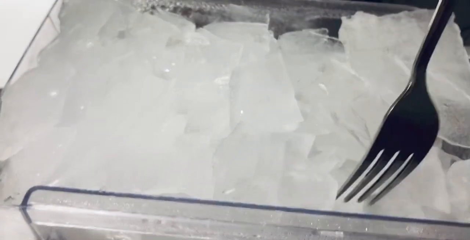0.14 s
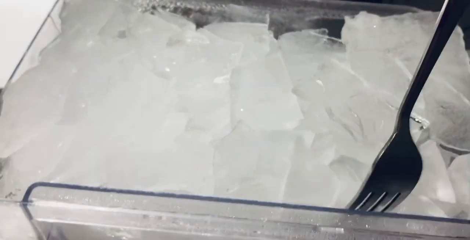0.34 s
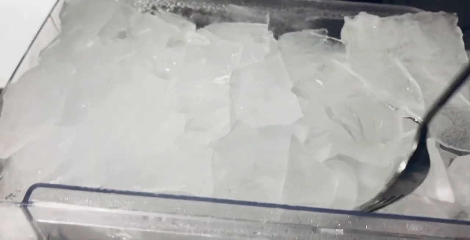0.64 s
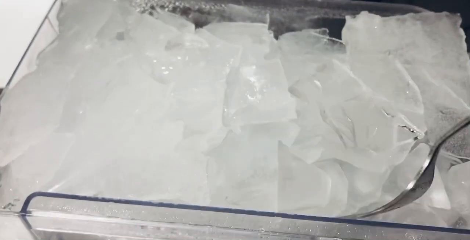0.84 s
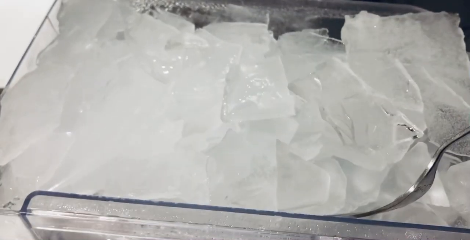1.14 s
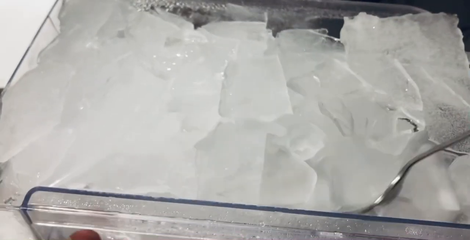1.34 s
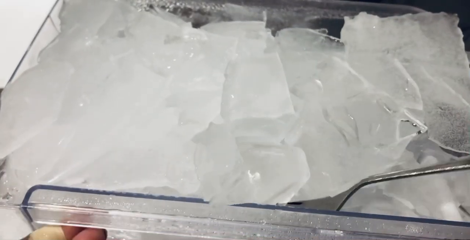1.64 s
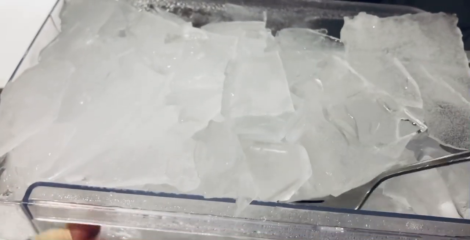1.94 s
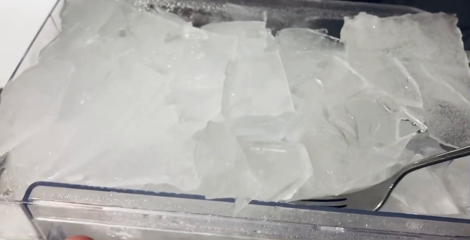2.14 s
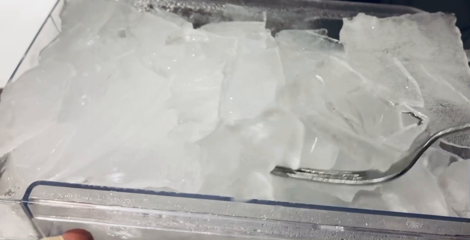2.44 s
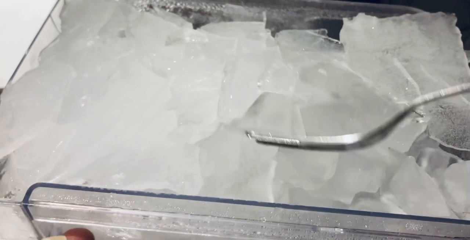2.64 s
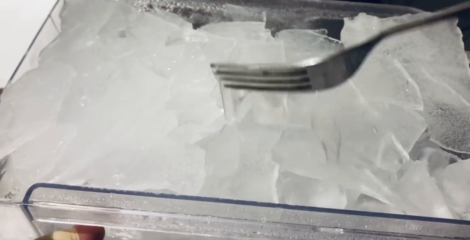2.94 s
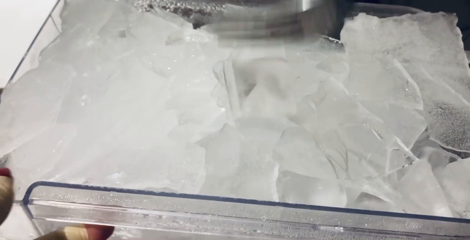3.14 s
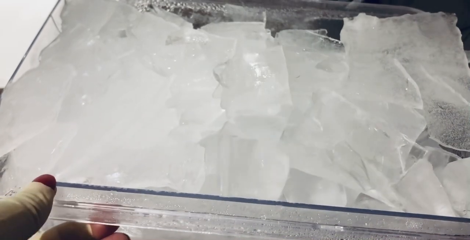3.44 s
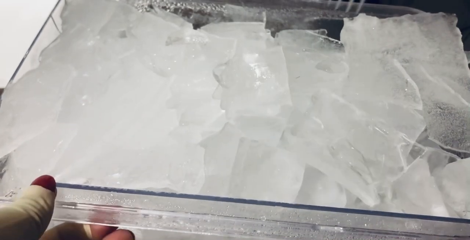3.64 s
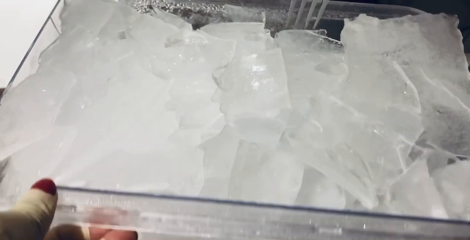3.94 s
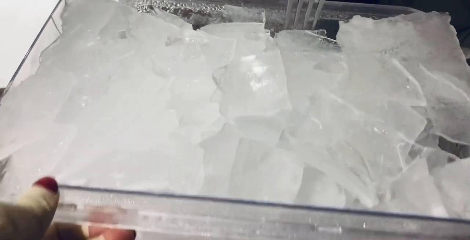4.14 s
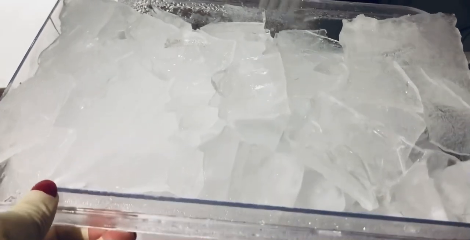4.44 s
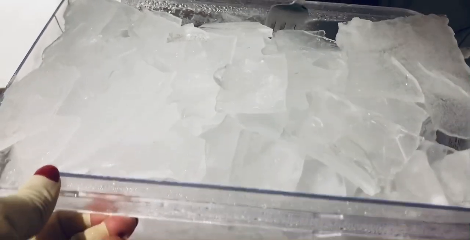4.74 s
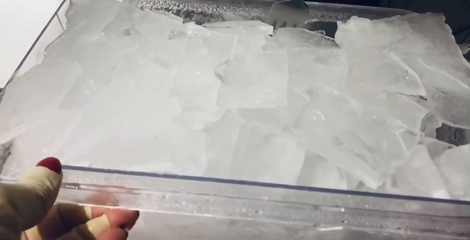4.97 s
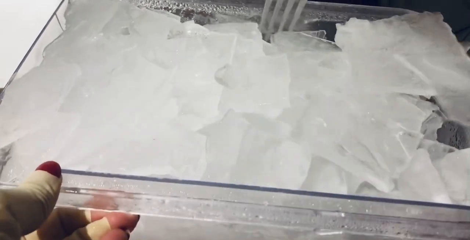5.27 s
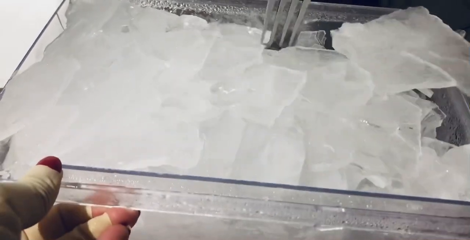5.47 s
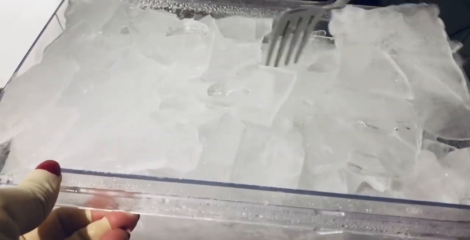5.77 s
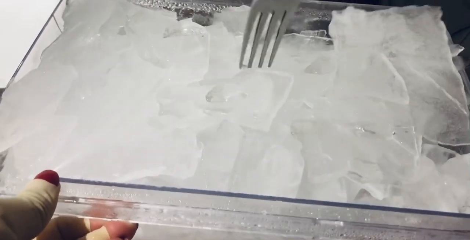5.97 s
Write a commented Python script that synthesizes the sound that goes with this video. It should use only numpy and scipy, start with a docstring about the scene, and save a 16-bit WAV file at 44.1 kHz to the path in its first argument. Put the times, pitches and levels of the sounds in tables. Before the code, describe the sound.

Heard close up at a freezer, over its faint hum, a few dull knocks on a plastic drawer lead into a sharp crunch of a metal fork breaking frost. The wedged tines tick and chatter lightly, then spring free with a thin ring. Loose ice clacks down in the hollow drawer, and after a brief pause the fork digs in again with repeated gritty scrapes and brittle snaps.

```python
"""A crisp crunch and dull knocks, close to one microphone at a plastic freezer drawer.
A steel fork bumps the drawer, then scrapes and levers slabs of frost: its tines crush tiny grains, ring
as they catch and chatter while wedged. Edges snap off, loose slabs drop back with a clack, and every
fracture shakes the hollow drawer, which groans briefly on its runners. The freezer hums faintly behind."""
import sys
import numpy as np
from scipy import signal
from scipy.fft import rfft, irfft
from scipy.io import wavfile
from scipy.ndimage import uniform_filter1d, minimum_filter1d, map_coordinates

SR = 44100
rng = np.random.default_rng(int(sys.argv[2]) if len(sys.argv) > 2 else 0)


def wrap_up_sound(samples):
    """Save the sound to the file named by the first command line argument, as 16-bit audio."""
    columns = np.atleast_2d(samples).T
    # keep every value between -1 and 1, then stretch to whole-number steps
    tamed = np.clip(columns, -1, 1)
    steps = np.round(tamed * 32767).astype(np.int16)
    wavfile.write(sys.argv[1], SR, steps)


N = 269451
TIME = np.arange(N) / SR

# spectra of the freezer's hum, the frost grit, a scraped slab and the hollow drawer: f/Hz, level/dB
HUM_SPECTRUM = [(20, -30), (45, -17), (80, -7), (125, -5), (200, -14.5), (260, -11), (500, -49),
                (1200, -41), (4000, -38), (16000, -40.5)]
GRIT_SPECTRUM = [(2000, -14.5), (3200, -8.5), (4100, 1), (5000, -3.5), (6500, 1.5), (7800, 0.5),
                 (10500, 0.5), (13500, -0.5), (15300, 4), (17500, -32)]
SLAB_SPECTRUM = [(600, -18), (1000, 0), (1220, -0.5), (1450, 5.5), (1900, -1), (2700, -1), (3800, -3)]
DRAWER_SPECTRUM = [(45, -26), (120, -18), (220, -10.5), (330, -5), (440, 1), (560, 3), (700, -1.5),
                   (880, -6), (1400, -18.5)]
# pushes of the fork into the frost: t/s, rise/s, hold/s, level/dB, extra drive to slabs and drawer/dB
PUSHES = [(0.023, 0.0034, 0.013, -27, 1.5), (0.059, 0.0035, 0.006, -32.5, 7.5),
          (0.174, 0.026, 0.12, -36.5, 4.5), (0.261, 0.0058, 0.0067, -29, -4),
          (0.689, 0.0044, 0.0057, -28, -9), (1.135, 0.07, 0.016, -18, -4.5),
          (1.218, 0.0092, 0.0076, -14, -3), (1.243, 0.014, 0.003, -13.5, -7),
          (1.262, 0.017, 0.069, -18.5, -0.5), (1.351, 0.005, 0.048, -26, -6), (1.413, 0.06, 0.16, -32, -1),
          (1.556, 0.0063, 0.0069, -28.5, 4), (1.652, 0.013, 0.007, -36.5, 4.5),
          (1.996, 0.0061, 0.007, -36.5, -4.5), (2.233, 0.0075, 0.0064, -32.5, -3),
          (2.261, 0.042, 0.013, -17, -1.5), (2.313, 0.0113, 0.084, -30.5, -3.5),
          (2.482, 0.045, 0.054, -36.5, 1), (2.59, 0.081, 0.14, -35.5, 2),
          (2.731, 0.077, 0.0075, -25.5, -4.5), (3.168, 0.0077, 0.0072, -39.5, 6),
          (3.261, 0.0078, 0.027, -40, 2), (4.387, 0.0067, 0.008, -21.5, -6.5),
          (4.394, 0.05, 0.071, -20, -1), (4.537, .005, 0.0049, -28.5, -2),
          (4.604, 0.027, 0.066, -40.5, -0.5), (4.729, 0.003, 0.0033, -32.5, 2),
          (4.758, 0.0036, 0.075, -29.5, 0.5), (4.936, 0.013, 0.042, -31, -2.5),
          (5.005, 0.049, 0.018, -19.5, -2), (5.137, 0.0092, 0.0076, -27, -2.5),
          (5.173, 0.089, 0.042, -22.5, -5), (5.302, 0.034, 0.066, -27.5, -5),
          (5.411, 0.039, 0.062, -34.5, -2.5), (5.527, 0.0073, 0.057, -34.5, 2),
          (5.662, 0.026, 0.0066, -25, 4), (5.732, 0.0125, 0.036, -28, 2.5),
          (5.799, 0.0065, 0.0076, -19, -1), (5.869, 0.0063, 0.064, -42.5, 2),
          (6.007, 0.0032, 0.0049, -28.5, 4), (6.067, 0.0099, 0.011, -29.5, -1)]
# light slides between the pushes, one curve each: t/s, level/dB
SLIDES = [
    [(0.36, -84), (0.42, -52), (0.58, -36.5), (0.78, -41), (0.9, -49), (1.0, -63), (1.06, -56), (1.12, -59)],
    [(1.72, -45), (1.77, -37), (1.85, -58.5), (1.97, -47.5), (2.12, -51.5), (2.2, -66.5)],
    [(2.87, -54), (2.94, -45), (2.99, -70), (3.1, -53), (3.2, -49.5), (3.46, -47), (3.57, -48.5),
     (3.72, -65.5), (3.82, -77)],
    [(3.88, -42.5), (3.97, -58), (4.17, -63), (4.36, -82.5)],
]
# one value a slide: extra drive to slabs and drawer/dB
SLIDE_HOLLOW_DB = [-5, -1, 5, 3.5]
# soft frost rasps finely, hard ice breaks coarsely: t/s, coarseness (1 = usual)
COARSENESS = [(.3, .6), (.45, .95), (1.0, .9), (1.15, .45), (1.5, .55), (1.75, 1.1), (2.2, 1.1), (2.28, .6),
              (2.45, 1.05), (4.85, 1.05), (5.03, .65), (5.8, .9)]
# modes of the dragging tines: f/Hz, level/dB, t60/s
TINE_MODES = [(4045, -25, 0.04), (5500, -27, 0.04), (6400, -19.5, 0.035), (8550, -24, 0.04),
              (9980, -19, 0.03), (13100, -18, 0.03)]
# the slab under the fork: from t/s, pitch as a multiple of the usual slab's
SLABS_TOUCHED = [(0, 1.33), (1.1, 1.0)]
# dull knocks, the fork bumping the drawer at first, then slabs landing with a clack:
# t/s, thump level/dB, thump f/Hz, clack level/dB
KNOCKS = [(0.03, -27.5, 420, -50), (0.062, -26, 540, -45), (0.2, -28.5, 700, -50),
          (0.279, -26.5, 500, -28.5), (0.695, -32, 493, -57), (0.758, -34, 487, -37), (1.56, -35, 570, -25),
          (2.729, -20.5, 510, -23.5), (3.122, -31, 510, -27.5), (3.312, -24.5, 544, -20.5),
          (3.437, -30, 527, -27), (3.609, -18.5, 404, -17.5), (3.842, -28.5, 460, -29.5),
          (3.852, -23.5, 440, -18.5), (3.862, -22.5, 334, -39), (4.04, -35.5, 495, -46.5),
          (4.074, -38, 498, -48.5), (4.462, -21, 440, -25), (4.501, -20.5, 340, -17),
          (4.655, -26, 467, -30), (4.696, -33, 410, -30.5), (4.783, -29, 384, -37),
          (4.968, -22, 414, -22.5)]
# spectrum of a knock's clack: f/Hz, level/dB
CLACK_SPECTRUM = [(720, -31.5), (960, 0), (1180, -4.5), (1490, 6), (1950, -6), (2430, 3.5), (2630, -4),
                  (2900, 3), (3500, -5.5), (16000, -14)]
# spectrum of a knock's thump: multiple of its pitch, level/dB
THUMP_SPECTRUM = [(.45, -21), (.8, -3.5), (1, 0), (1.35, -4), (1.8, -18)]
# brittle snaps, dry at low Q, glassy at high: t/s, level/dB, shard f/Hz, Q, drawer level/dB, rise/s
SNAPS = [(0.2311, -24.5, 4370, 3.7, -35, 0.0014), (0.592, -34, 9500, 1.4, -65, .0004),
         (0.6238, -28, 11200, 30, -37.5, 0.0021), (0.66, -39, 12500, 1.9, -64, 0.0016),
         (0.853, -32, 8200, 1.8, -78, 0.0011), (0.892, -41, 3450, 0.7, -48, 0.00097),
         (1.021, -39.5, 4400, 2.9, -53.5, 0.0012), (1.3069, -0.5, 10000, 30, -36, 0.0004),
         (1.336, -19.5, 9400, 22, -40, 0.00064), (1.564, -22, 4000, 1.1, -53, 0.00084),
         (1.7695, -32, 11600, 10, -63, 0.0007), (2.2122, -18, 15000, 5.4, -75, 0.00069),
         (2.386, -25, 2000, 0.57, -32, 0.00072), (2.4585, -23, 15000, 2, -45, 0.00036),
         (2.502, -22.5, 13200, 10, -52, 0.00063), (2.516, -26.5, 5770, 0.31, -44, 0.0016),
         (2.645, -20.5, 8860, 33, -46, 0.00071), (2.7891, -13, 4330, 1.6, -65, 0.00034),
         (2.8098, -24, 5870, 1.8, -32.5, 0.0005), (2.818, -26, 5300, 0.96, -32.5, 0.00064),
         (2.956, -26.5, 3600, 1.1, -38.5, 0.0013), (3.0204, -34.5, 4220, 6.9, -45, 0.00051),
         (3.09, -29, 14800, 2.5, -44, 0.00092), (3.1635, -26, 4500, 5.2, -35.5, 0.00041),
         (3.186, -26, 1500, 0.86, -41, 0.0018), (3.22, -26.5, 6100, 3.5, -65, 0.00061),
         (3.2386, -20, 5600, 4.7, -36, 0.00023), (3.2493, -9, 14100, 1.6, -30, 0.00063),
         (3.2862, -28, 13000, 2.5, -53, 0.00049), (3.3666, -25, 6000, 2.9, -46, 0.00063),
         (3.5135, -31, 2720, 2.9, -57, 0.0004), (3.632, -21, 14200, 7.9, -49.5, 0.0017),
         (3.763, -37.5, 1860, 1.1, -42.5, 0.00086), (4.2537, -49, 2550, 12, -59, 0.00064),
         (4.422, -15.5, 11900, 1.5, -46, 0.0016), (4.4444, -8, 5650, 1.1, -22.5, 0.0015),
         (4.5167, -14, 5000, 1.3, -46, 0.0013), (4.656, -27, 4540, 1, -63, 0.0006),
         (4.6967, -28, 5400, 0.8, -42, 0.0009), (4.8125, -21, 8500, 0.8, -45, 0.0014),
         (4.889, -36, 5300, 1, -63, 0.0009), (5.0819, -20.5, 7300, 1.7, -49, 0.0014),
         (5.2688, -16, 8300, 1.6, -51, 0.0012), (5.3996, -22, 1830, 2.3, -44, 0.0025),
         (5.6524, -11.5, 9000, 0.55, -28, 0.0011), (5.721, -21, 7200, .4, -32, 0.00072),
         (5.8392, -8.5, 9500, 0.73, -32, 0.00096), (6.1028, -18, 11700, 2.5, -74, 0.00072)]
# the drawer shifting on its runners under the holding hand: t/s, groan level/dB, rumble level/dB
RUNNER_LEVELS = [(.3, -64, -90), (.55, -59.5, -76), (.59, -42, -70), (.64, -57.5, -55.5),
                 (.87, -59.5, -54.5), (1.12, -80, -77)]
# a freed tine or the drawer's wall ringing on: t/s, starting level/dB, f/Hz, t60/s
RINGS = [(1.313, -9, 6400, 0.038), (2.459, -21, 13870, 0.039), (2.809, -7.5, 6400, 0.036),
         (2.81, -11, 9800, 0.042), (3.02, -46, 12000, 0.46), (4.831, -26.5, 570, .1),
         (5.082, -25, 6400, 0.097), (5.655, -38, 4690, 0.66)]
# the tines wedged against the drawer's front: t/s, firmness (0-1)
WEDGE_FIRMNESS = [(1.54, 0.13), (1.78, 0.83), (2.19, 0.85)]
# modes of the wedged tines: f/Hz, level/dB, t60/s
WEDGED_MODES = [(7300, -20, .02), (11120, -2.5, 0.026), (12480, -7, 0.045), (15000, 5, 0.018)]

USUAL_GRIT_DB = -30.5
# slabs, drawer and jerks follow only a share of the grit's swing in dB, so a light touch sounds dull
SLAB_DB, SLAB_FOLLOWS = -37, 0.84
DRAWER_DB, DRAWER_FOLLOWS = -39, 0.71
JERK_DB, JERK_FOLLOWS = -29.5, 0.71
LIFTED_FROM_S, LIFTED_TO_S, LIFTED_DB = 2.45, 3.7, 7   # clear of the pile, the fork rings more freely


def from_db(db):
    """Decibels to gain."""
    return 10 ** (np.asarray(db) / 20)


def rms_one(x):
    """Scale to rms 1."""
    return x / np.sqrt(np.mean(x ** 2) + 1e-20)


def in_time(rows):
    """Each column of a curve at every sample."""
    s, *columns = np.transpose(rows)
    return [np.interp(TIME, s, column) for column in columns]


def add(out, s, sound):
    """Mix a sound in at time s."""
    at = max(round(s * SR), 0)
    out[at:at + len(sound)] += sound[:max(N - at, 0)]


def colour(x, spectrum, size=4096):
    """Minimum-phase filter with the given spectrum, falling 10 dB an octave beyond its ends."""
    hz, db = np.transpose(spectrum)
    grid = np.maximum(np.fft.rfftfreq(size, 1 / SR), 1)
    octaves_beyond = np.maximum(np.log2(hz[0] / grid), 0) + np.maximum(np.log2(grid / hz[-1]), 0)
    gain = from_db(np.interp(np.log(grid), np.log(hz), db) - 10 * octaves_beyond)
    cepstrum = irfft(np.log(gain))
    cepstrum[1:size // 2] *= 2
    cepstrum[size // 2 + 1:] = 0
    return signal.fftconvolve(x, irfft(np.exp(rfft(cepstrum))))[:len(x)]


def resonate(x, hz, q):
    """One band-pass resonance."""
    hz = min(hz, SR * .45)
    return signal.lfilter(*signal.iirpeak(hz, max(q, 3 * hz / SR), fs=SR), x + 1e-18)


def steady(x, span_s):
    """Keep the grain of a texture but even out its slower level."""
    span = int(span_s * SR)
    power = uniform_filter1d(uniform_filter1d(x ** 2, span), span)
    return x / np.sqrt(np.abs(power) + 1e-20)


def wander(x, share=.04, rate_hz=9):
    """No two grains or tines are the same size: their pitches stray from moment to moment."""
    drift = resonate(rng.standard_normal(N), rate_hz, q=0.99)
    drift = rms_one(resonate(drift, rate_hz, q=0.99))
    shift = drift * share * SR / (2 * np.pi * rate_hz)
    return map_coordinates(x, [np.arange(N) + shift], mode="nearest")


def freezer_hum(db=-63.5):
    """The freezer in the background: steady, low noise."""
    return from_db(db) * rms_one(colour(rng.standard_normal(N), HUM_SPECTRUM))


def scraping():
    """One stream of grains sounds in the grit, slabs and drawer, while the fork's tines ring."""
    grit, slab, drawer = effort()
    sizes, envelope = grains(grit)
    on_grit, on_slab, on_drawer = envelope * rng.standard_normal((3, N))
    chip_notes = steady(wander(chips(sizes)), span_s=0.038)
    crunch = rms_one(colour(on_grit + 0.5 * chip_notes, GRIT_SPECTRUM))
    crunch *= from_db(-1.5) * (1 - 0.2 * wedging())   # wedged tines crush less frost
    steel = wander(tines(grit), share=.006) + chattering(grit)
    slab_ring = from_db(-0.5) * steady(slabs(on_slab), span_s=0.023)
    crumb_notes = from_db(-2) * wander(crumbs())
    drawer_ring = steady(colour(on_drawer, DRAWER_SPECTRUM), span_s=0.082)
    return grit * crunch + steel + slab * (slab_ring + crumb_notes) + drawer * drawer_ring


def effort():
    """Pushes and slides add in power; gives the amplitudes of the grit, the slabs and the drawer."""
    lumps = stick_slip()
    moves = [(from_db(db) * pushing(s, rise_s, hold_s) * lumps, hollow_db)
             for s, rise_s, hold_s, db, hollow_db in PUSHES]
    moves += [(sliding(curve), hollow_db) for curve, hollow_db in zip(SLIDES, SLIDE_HOLLOW_DB)]
    grit = np.sqrt(sum(level ** 2 for level, _ in moves))
    force = np.sqrt(sum((level * from_db(hollow_db)) ** 2 for level, hollow_db in moves))
    force /= from_db(USUAL_GRIT_DB)
    return grit, from_db(SLAB_DB) * force ** SLAB_FOLLOWS, from_db(DRAWER_DB) * force ** DRAWER_FOLLOWS


def stick_slip(rate_hz=45, spread_db=1.7):
    """The tines stick and slip, so a push comes in small lumps: a gain of mean power 1."""
    lumps = rms_one(resonate(rng.standard_normal(N), rate_hz, q=0.66))
    coarse, = in_time(COARSENESS)
    return rms_one(from_db(spread_db * coarse * lumps))


def pushing(s, rise_s, hold_s, release_s=0.011, trickle_s=0.098, trickle_db=-18):
    """Force builds up and holds; the frost gives way and loosened crumbs trickle after."""
    rise = np.clip((TIME - s) / rise_s, 0, 1)
    late = np.clip(TIME - s - rise_s - hold_s, 0, 1)
    trickle = from_db(trickle_db)
    return rise * ((1 - trickle) * np.exp(-late / release_s) + trickle * np.exp(-late / trickle_s))


def grains(grit, spread_db=6, decay_s=.001):
    """Frost grains break at random, more densely under force; gives their sizes and joint envelope."""
    per_s = 2200 * (grit / from_db(-33)) ** 0.38
    sizes = from_db(spread_db * np.minimum(rng.exponential(1, N), 4))
    sizes *= rng.random(N) < per_s / SR
    energy = signal.lfilter([1], [1, -np.exp(-2 / (decay_s * SR))], sizes ** 2 + from_db(-24))
    coarse, = in_time(COARSENESS)
    return sizes ** coarse, steady(np.sqrt(energy) ** coarse, span_s=0.031)


def chips(sizes, q=51, count=28):
    """Each broken grain rings briefly at one of many high pitches."""
    note = rng.integers(0, count, N)
    clicks = sizes * rng.choice([-1, 1], N)
    pitches = np.linspace(2800, 15500, count)
    return sum(resonate(clicks * (note == k), hz, q) / np.sqrt(hz) for k, hz in enumerate(pitches))


def catches(per_s, spread_db=4.5):
    """Sparse, uneven clicks of either sign; mean power 1."""
    sizes = from_db(spread_db * np.minimum(rng.exponential(1, N), 3)) * rng.choice([-1, 1], N)
    return rms_one(sizes * (rng.random(N) < per_s / SR))


def tines(grit):
    """A tine catches on the ice and springs free; each catch plucks one of the steel's modes."""
    out = np.zeros(N)
    lifted = (TIME > LIFTED_FROM_S) & (TIME < LIFTED_TO_S)
    drive = grit * from_db(LIFTED_DB * lifted)
    for hz, db, t60 in TINE_MODES:
        decay_s = t60 / np.log(1000)
        plucks = drive * catches(per_s=65)
        out += from_db(db) * resonate(plucks, hz, q=np.pi * hz * decay_s) * np.sqrt(SR * decay_s)
    return out


def slabs(force):
    """The slab under the fork rings at the pitch of its size."""
    out = np.zeros(N)
    for s, pitch in SLABS_TOUCHED:
        out = np.where(TIME >= s, colour(force, np.array(SLAB_SPECTRUM) * [pitch, 1]), out)
    return out


def crumbs(per_s=420, q=24, count=20):
    """Larger crumbs of ice break with short, hollow notes of their own; rms 1."""
    pitches = np.geomspace(950, 4800, count)
    return rms_one(sum(resonate(catches(per_s / count), hz, q) / hz ** 0.054 for hz in pitches))


def burst(decay_s, size=4096):
    """A short burst of noise that dies away."""
    return rng.standard_normal(size) * np.exp(-np.arange(size) / (decay_s * SR))


def hit(sound, db, span_s=.005):
    """Set a short sound's level, taken as its energy spread over span_s."""
    return from_db(db) * sound * np.sqrt(span_s * SR / np.sum(sound ** 2))


def knocking(pitch_spread=.04):
    """Dull knocks: the fork bumps the drawer at first, then slabs land with a clack over the thump."""
    out = np.zeros(N)
    for s, thump_db, thump_hz, clack_db in KNOCKS:
        pitch = 1 + pitch_spread * rng.uniform(-1, 1)
        clack = colour(burst(decay_s=0.0039), np.array(CLACK_SPECTRUM) * [pitch, 1])
        thump = colour(burst(decay_s=0.0039), np.array(THUMP_SPECTRUM) * [thump_hz, 1])
        add(out, s, hit(clack, clack_db))
        add(out, s + 0.001546, hit(thump, thump_db))
    return out


def fracture(rise_s, size=4096):
    """A running crack: micro-cracks swell for the given time, then die away."""
    age = np.arange(size) / (rise_s * SR)
    return rng.standard_normal(size) * age * np.exp(1 - age)


def snapping():
    """A shard cracks off and rings; the slow bending wave reaches the slab, then the drawer."""
    out = np.zeros(N)
    for s, db, hz, q, drawer_db, rise_s in SNAPS:
        crack = fracture(rise_s) + from_db(-18) * burst(decay_s=0.0042)   # debris follows the break
        shard = colour(resonate(crack, hz, q), [(900, -5.5), (2500, -4), (17500, -2)])
        slab = colour(burst(decay_s=0.0047), SLAB_SPECTRUM)
        drawer = colour(burst(decay_s=0.0029), DRAWER_SPECTRUM)
        add(out, s, hit(shard, db - .5))
        add(out, s, hit(colour(crack, GRIT_SPECTRUM), db - 10))
        add(out, s + 0.001104, hit(slab, (db + drawer_db) / 2 - 6))
        add(out, s + 0.002, hit(drawer, drawer_db))
    return out


def sliding(curve, fade_s=0.014):
    """The fork slides lightly over loose ice: the level fades in, follows its curve and fades out."""
    db, = in_time(curve)
    outside_s = np.maximum(curve[0][0] - TIME, 0) + np.maximum(TIME - curve[-1][0], 0)
    return from_db(db) * np.exp(-outside_s / fade_s)


def runners(groan_hz=202):
    """Plastic sticks and slips on plastic: a short wavering groan over a dull rumble."""
    groan, rumble = map(from_db, in_time(RUNNER_LEVELS))
    waver = rms_one(resonate(rng.standard_normal(N), hz=22, q=.7))
    tone = np.sqrt(2) * np.sin(2 * np.pi * np.cumsum(groan_hz * (1 + 0.051 * waver)) / SR)
    rub = colour(rng.standard_normal(N), [(50, -7), (110, -2.5), (210, -5), (400, -5), (900, -33)])
    return groan * tone + rumble * rms_one(rub)


def ringing(count=4, detune=.005):
    """Freed tines or a struck wall give a thin, dying tone whose close partials beat."""
    out, age = np.zeros(N), TIME[:SR // 2]
    for s, db, hz, t60 in RINGS:
        partials = hz * (1 + detune * rng.standard_normal((count, 1)))
        cycles = partials * age + rng.random((count, 1))
        tone = np.sin(2 * np.pi * cycles).sum(axis=0) / np.sqrt(count)
        attack = np.minimum(hz * age / 2, 1)
        add(out, s, from_db(db - 60 * age / t60) * attack * tone)
    return out


def wedging():
    """How firmly the tines are wedged, 0-1."""
    return np.clip(np.interp(TIME, *np.transpose(WEDGE_FIRMNESS), left=0, right=0), 0, 1)


def chattering(grit, count=65, spread_db=4.5, detune=.006):
    """Wedged tines slip in tiny jerks; each ticks and rings them at slightly new levels and pitches."""
    out, age = np.zeros(N), TIME[:4096]
    level = wedging() * from_db(JERK_DB) * (grit / from_db(USUAL_GRIT_DB)) ** JERK_FOLLOWS
    for s in rng.uniform(WEDGE_FIRMNESS[0][0], WEDGE_FIRMNESS[-1][0], count):
        jerk = from_db(-9) * resonate(burst(decay_s=.001), hz=13500, q=1.8)   # the tick
        for hz, db, t60 in WEDGED_MODES:
            strength, stray = rng.standard_normal(2)
            envelope = from_db(db + spread_db * strength - 60 * age / t60)
            jerk += envelope * np.sin(2 * np.pi * hz * (1 + detune * stray) * age)
        add(out, s, level[int(s * SR)] * from_db(spread_db * rng.uniform(-1, 1)) * jerk)
    return out


def compartment(x, t60=0.29, size=16384):
    """The freezer's near plastic walls send dense, dull reflections back to the microphone."""
    age = np.arange(size) / SR
    tail = rng.standard_normal(size) * from_db(-60 * age / t60) * (age > .003)
    echo = signal.fftconvolve(x, tail / np.sqrt(np.sum(tail ** 2)))[:N]
    return x + from_db(-10) * colour(echo, [(250, -2), (520, -2.5), (1500, -3), (16000, -16)])


def scene():
    """Fork, ice and drawer close up in the compartment, the hum behind; mono."""
    ice = compartment(scraping() + snapping() + knocking() + ringing())
    return (ice + freezer_hum() + runners())[None]


def record(dry, ceiling=.75, limiter_s=.002, cutoff_hz=15800):
    """After the microphone, a fast limiter holds the peaks down and a steep low-pass cuts the top."""
    span = int(limiter_s * SR)
    needed_gain = ceiling / np.maximum(np.abs(dry), ceiling)
    gain = uniform_filter1d(minimum_filter1d(needed_gain, span), span)
    low_pass = signal.ellip(10, .1, 80, cutoff_hz, fs=SR, output="sos")
    return signal.sosfilt(low_pass, gain * dry)


dry = scene()
out = record(dry)
wrap_up_sound(out)
```